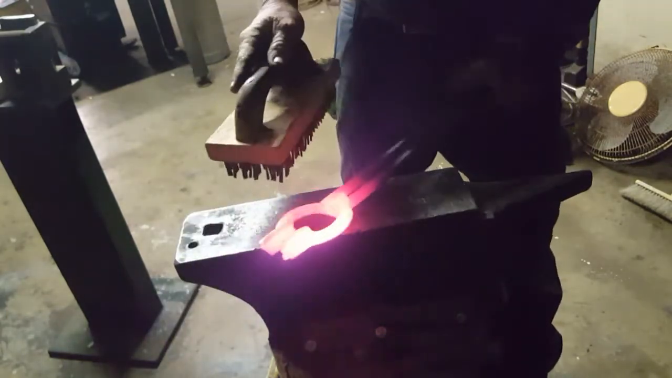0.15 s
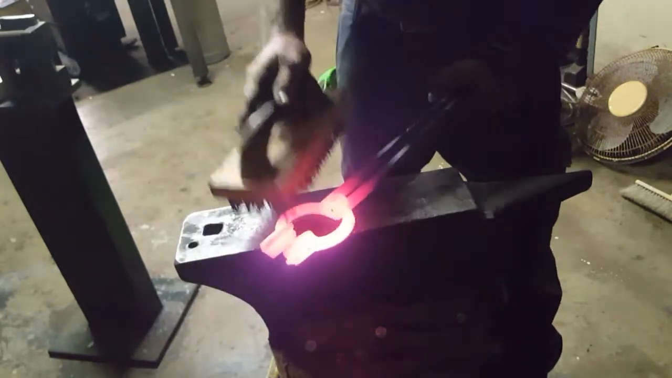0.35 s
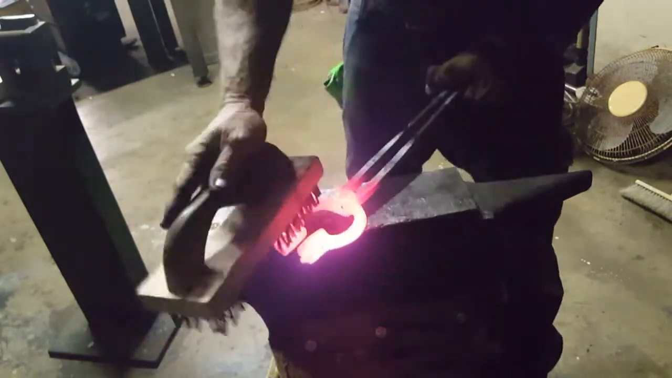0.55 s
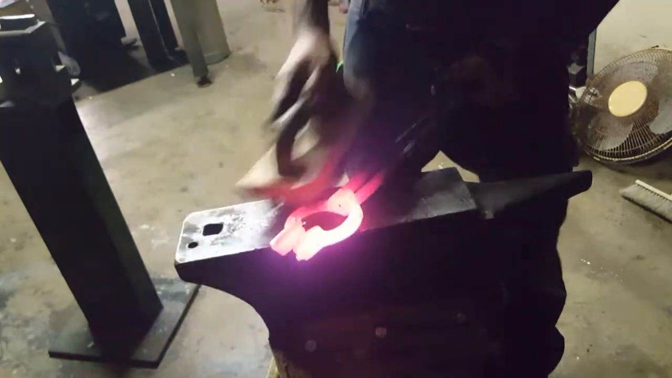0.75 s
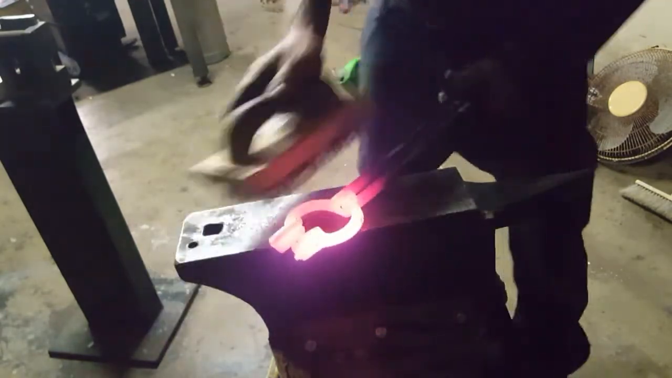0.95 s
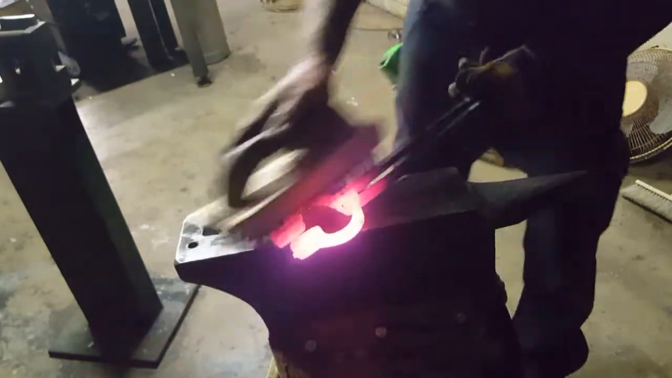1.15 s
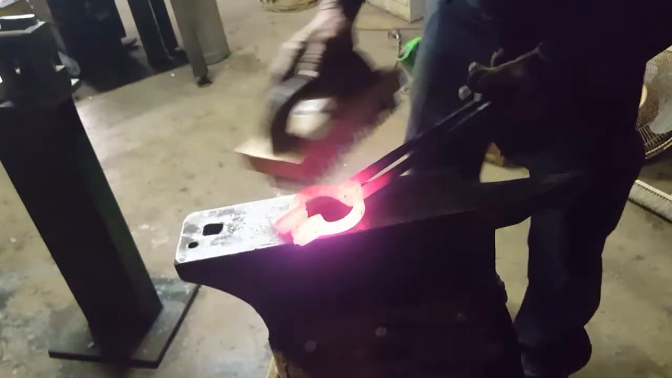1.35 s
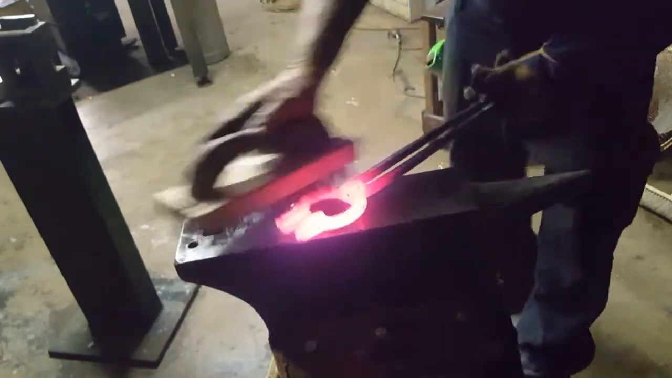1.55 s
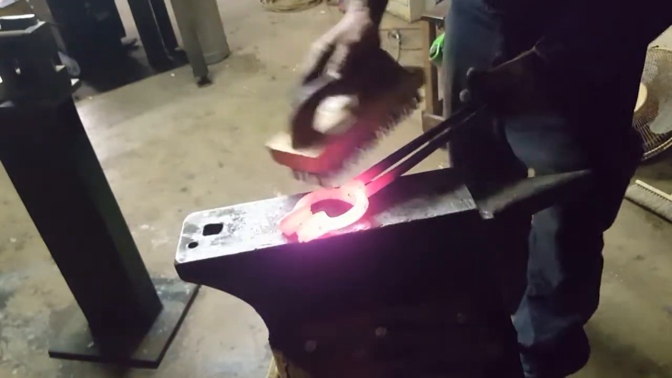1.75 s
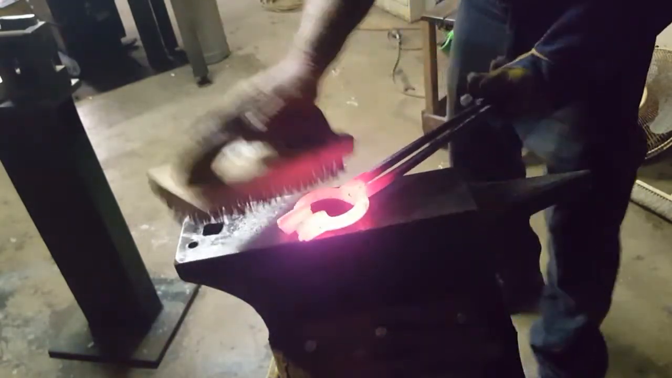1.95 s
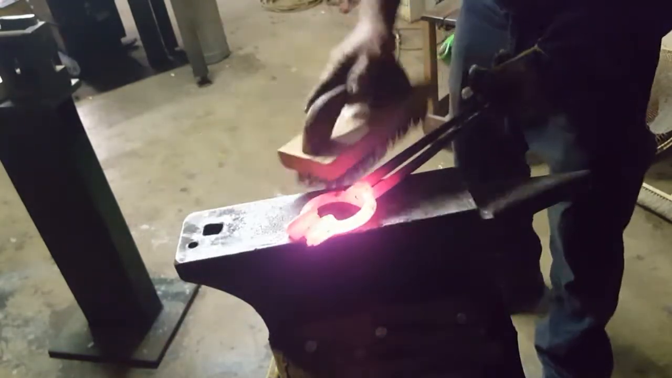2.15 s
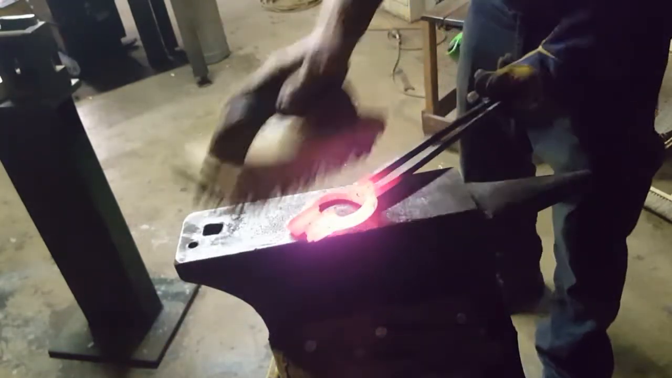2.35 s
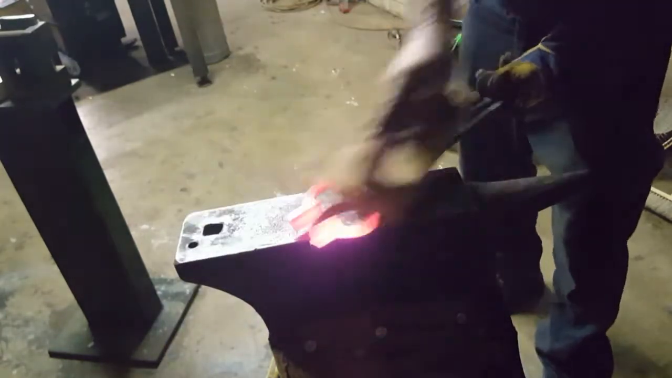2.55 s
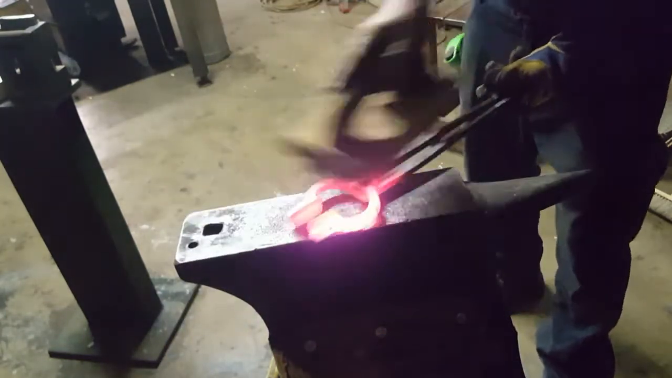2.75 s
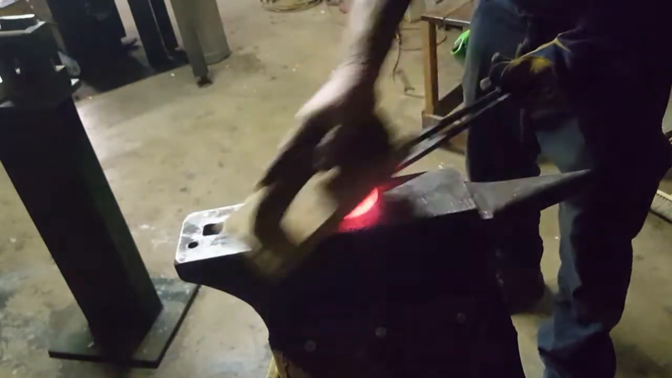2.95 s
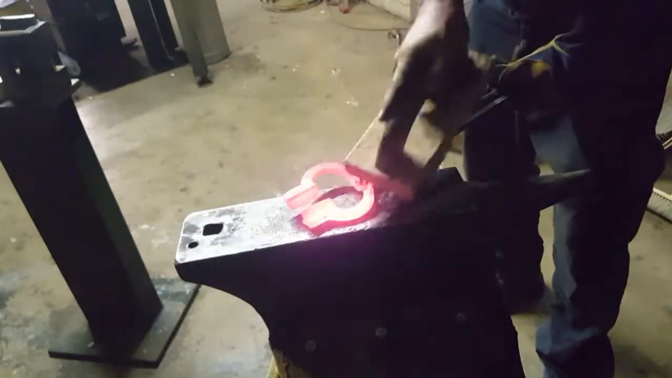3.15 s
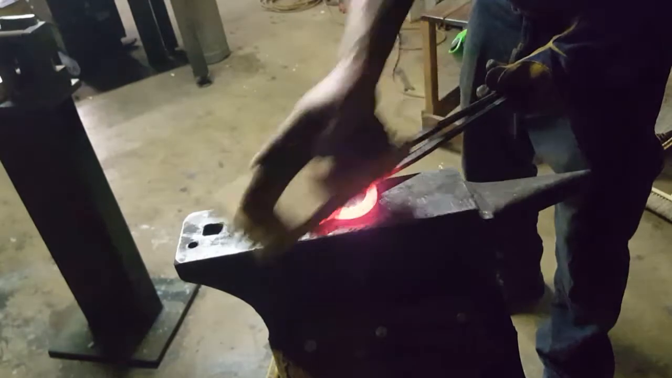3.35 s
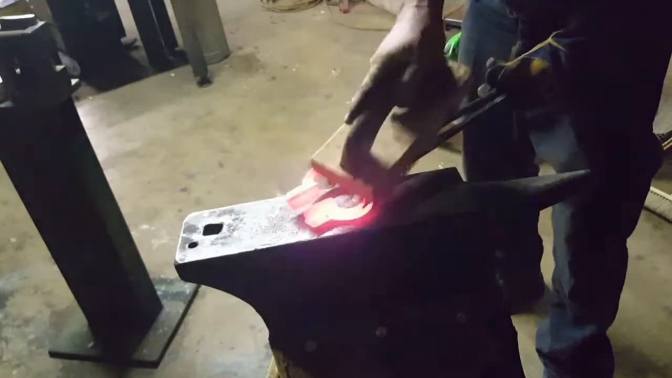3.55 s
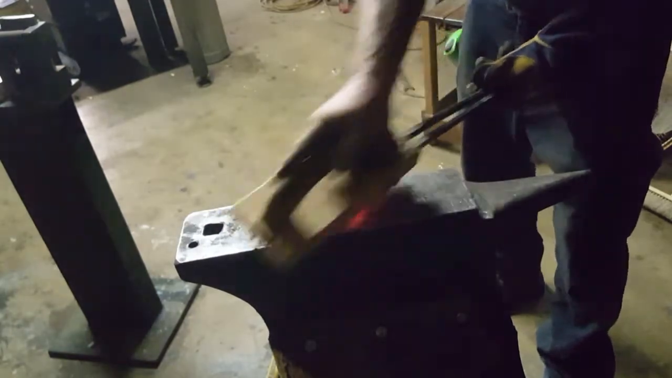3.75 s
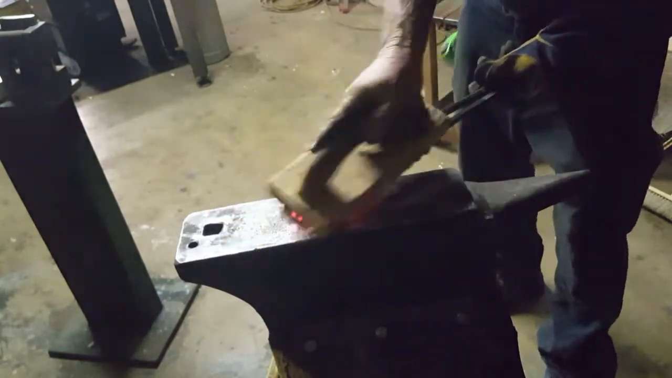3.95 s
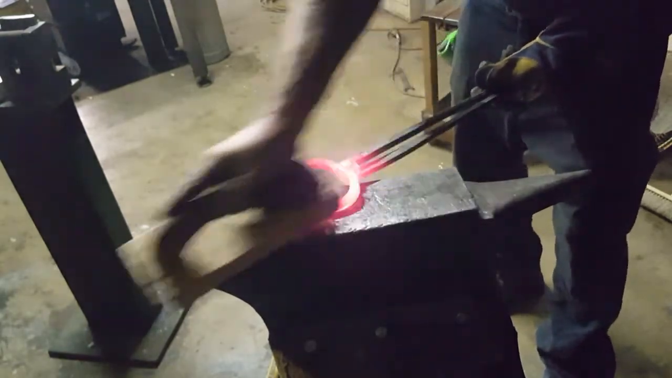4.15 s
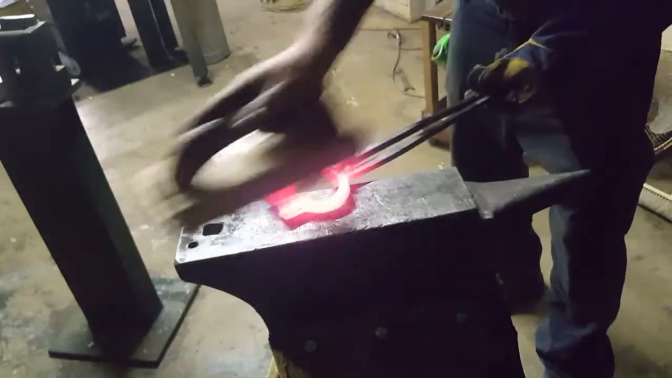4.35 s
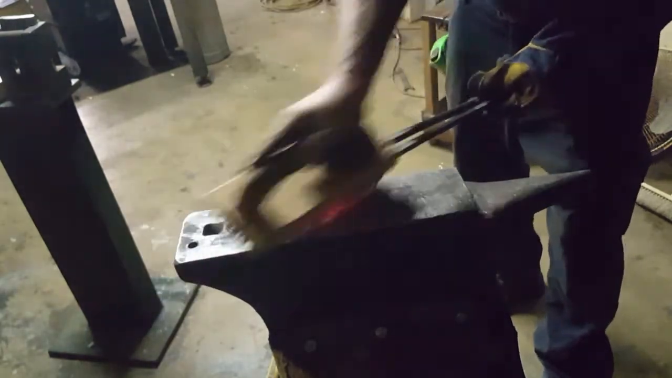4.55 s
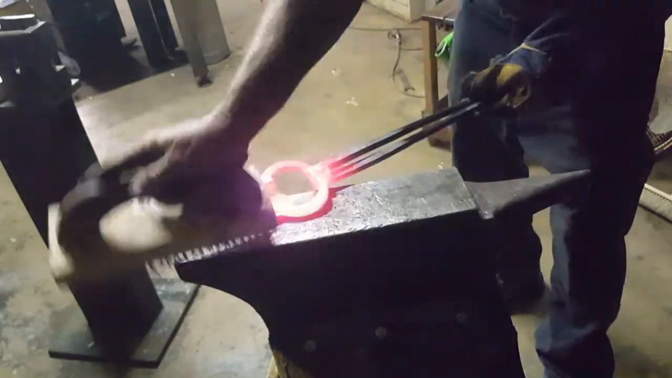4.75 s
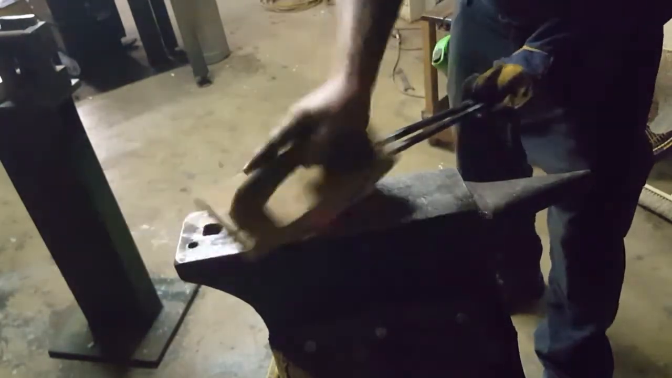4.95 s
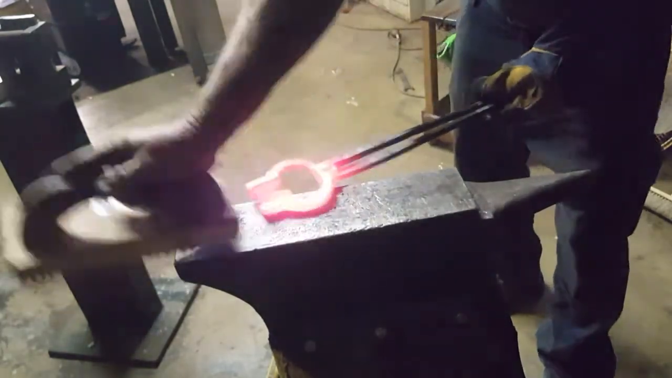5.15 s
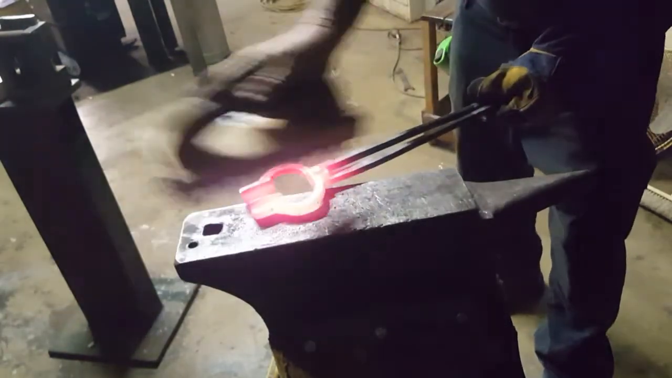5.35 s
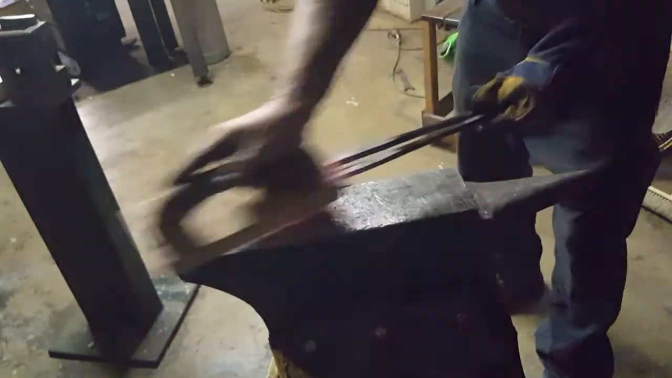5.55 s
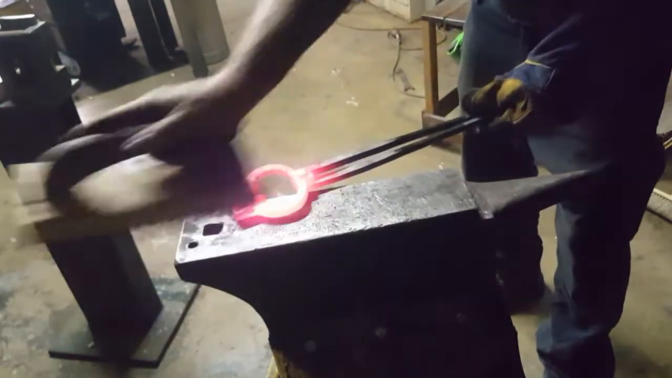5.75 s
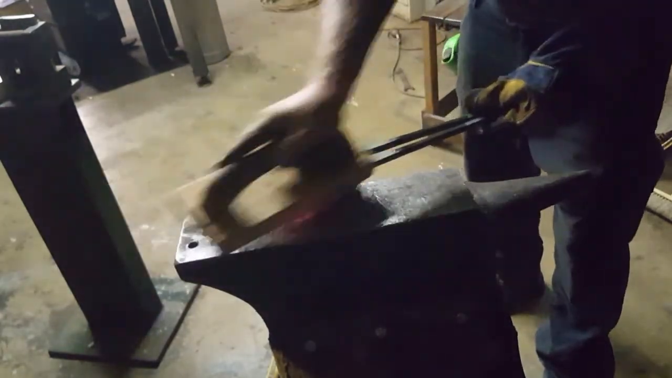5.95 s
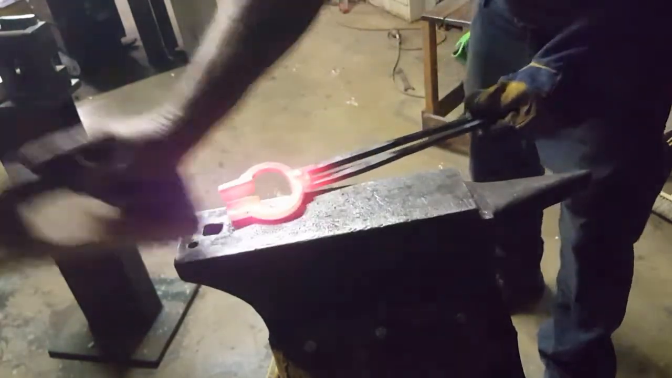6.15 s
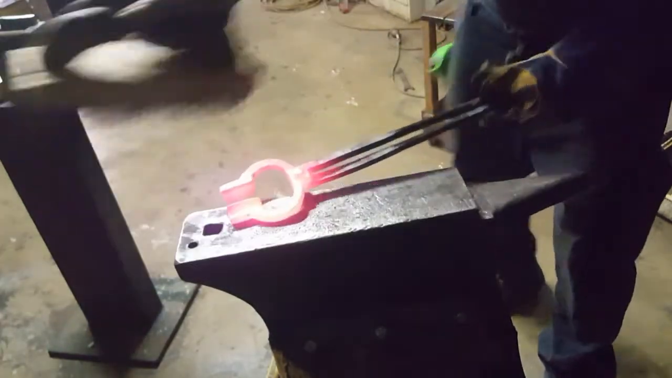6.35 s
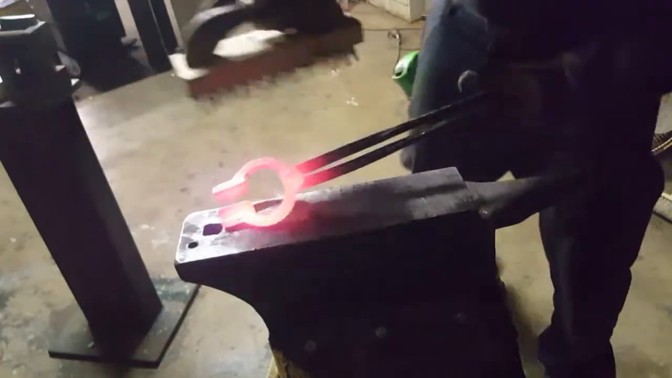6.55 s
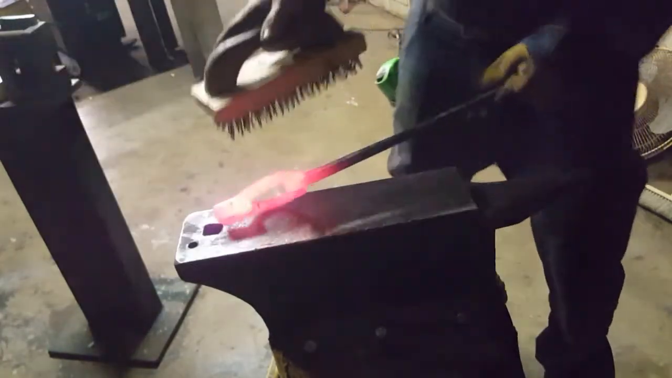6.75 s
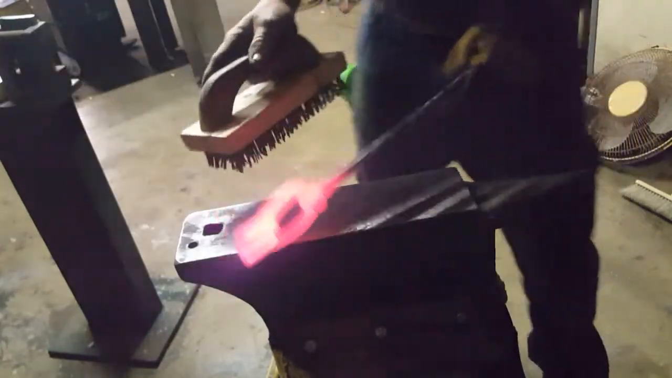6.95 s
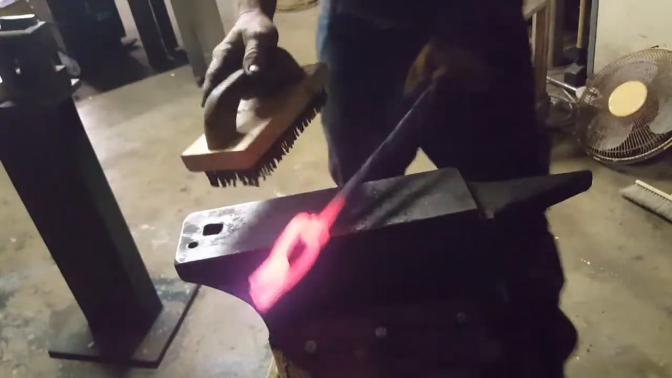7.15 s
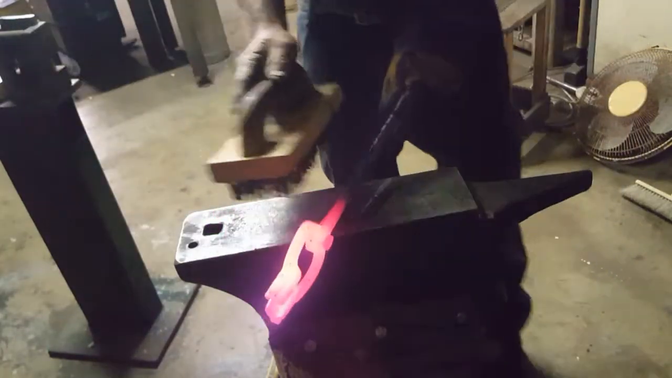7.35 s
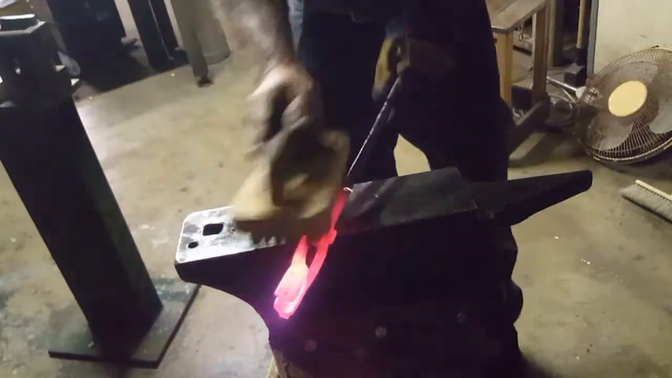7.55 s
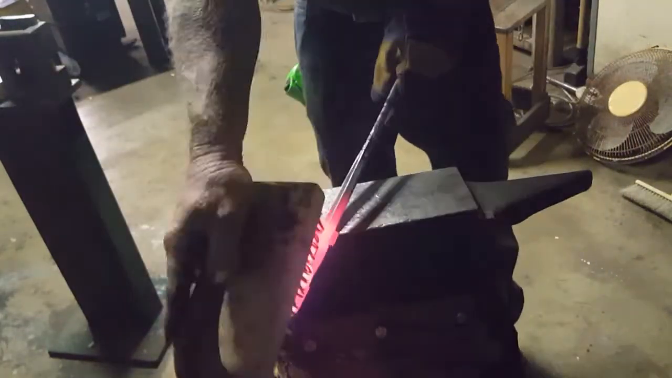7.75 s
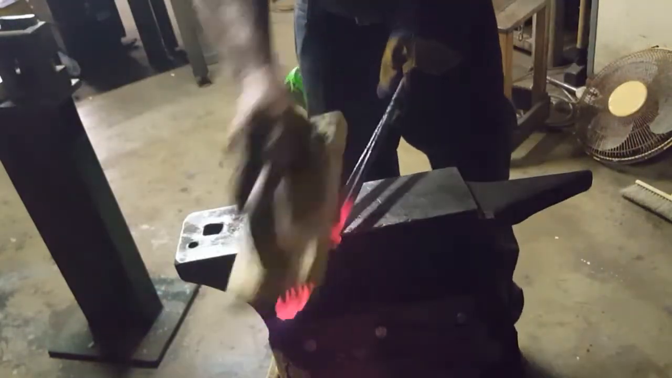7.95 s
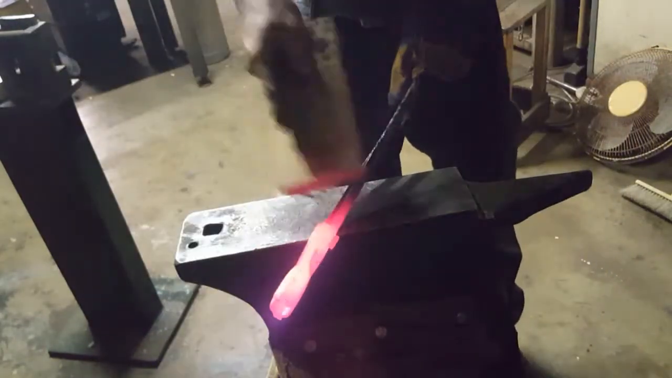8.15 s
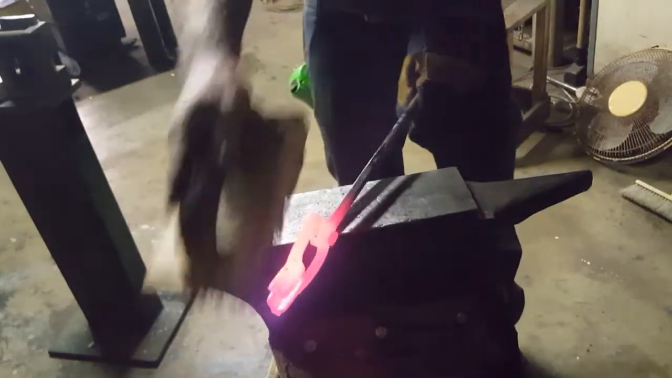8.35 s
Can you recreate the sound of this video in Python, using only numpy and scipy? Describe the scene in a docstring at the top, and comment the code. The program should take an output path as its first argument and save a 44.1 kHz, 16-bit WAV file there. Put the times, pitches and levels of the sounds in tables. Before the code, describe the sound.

A faint gas-forge roar with thin high hiss runs throughout a bare, briefly echoing workshop, heard close through a small microphone. At 0.06 s a wire brush lands and scrapes hot forging; near 0.65 s the piece cracks and clanks on the anvil. Scrubs follow at about 0.9, 1.15, 1.6, 2.0, 2.5, 3.0 and 3.45 s: gritty, snagging, metallic ringing around 1.3 to 4 kHz under bristle hiss, with low stand thumps and dull block knocks. A small tong ting sounds near 3.7 s. From 3.9 to 4.7 s strokes crowd together, then longer, brighter ones come at 5.0, 5.5, 6.0 and 6.47 s, with soft dull knocks between. Brushing stops around 6.7 s. Turning the piece brings light clanks and a short ting at 7.2 s, a sharp clank at 7.5 and a fuller one at 7.7 s. A weaker scrape comes at 8.07 s, then a brief touch at 8.25 and a final clank at 8.38 s.

```python
"""A block brush of stiff steel wires lands on a hot forging held on an anvil and scrubs across it in quick strokes.
Snagging and freed wires are random impulses that excite resonances of forging and tongs; their treble is a hiss,
and the push shakes the modes of the anvil stand. The forging clanks as struck modes when it is turned, the block
sounds dully and tongs ting. A bare workshop answers with decaying noise, over a gas forge of filtered noise."""
import sys
import numpy as np
from scipy import signal
from scipy.fft import rfft, irfft, next_fast_len
from scipy.io import wavfile
from scipy.ndimage import uniform_filter1d

SR = 44100
rng = np.random.default_rng(int(sys.argv[2]) if len(sys.argv) > 2 else 0)


def generate_wav(signal):
    """Clip the signal to [-1, 1] and save it as 16-bit WAV at the path in sys.argv[1]."""
    frames = np.transpose(np.atleast_2d(signal))
    scaled = np.clip(frames, -1, 1) * 32767
    pcm = np.round(scaled).astype(np.int16)
    wavfile.write(sys.argv[1], SR, pcm)


N = 370219

# Brush strokes, levels before the weights of each layer. Each row: landing in seconds; full pressure, top speed and
# lift-off in seconds after landing; fade after lift-off in dB per second; then levels in dB of low, middle and high
# ring, wire hiss, block rumble, stand shake, landing thud and landing knock.
STROKES = [(0.0608, 0.003, 0.083, 0.12, -220, -28, -21, -28.5, -28.5, -45, -26, -49, -46),
           (0.9017, 0.056, 0.12, .12, -260, -27, -23, -30.5, -25, -53, -33, -53, -58),
           (1.1167, 0.0027, 0.0093, 0.021, -300, -36, -47, -33, -35, -57, -50, -39, -50),
           (1.1463, 0.032, 0.032, 0.17, -230, -26.5, -20.5, -26, -24.5, -45, -30, -30.5, -50),
           (1.584, 0.0023, 0.0066, 0.049, -300, -36, -30.5, -38, -35.5, -54, -37, -35, -43),
           (1.638, 0.0062, 0.054, .14, -230, -23, -22.5, -26, -21.5, -38, -34, -42, -42),
           (2.0281, 0.052, 0.11, 0.18, -230, -23.5, -21.5, -23, -21.5, -40, -27.5, -41, -50),
           (2.4986, 0.004, 0.044, .15, -230, -25, -23, -26.5, -20.5, -37.5, -31.5, -24.5, -27.5),
           (2.9574, 0.011, 0.045, 0.14, -200, -22.5, -20.5, -22, -24, -47, -29, -50, -36),
           (3.4549, 0.0034, 0.03, .17, -230, -26.5, -21.5, -24, -26.5, -44, -30.5, -33.5, -26),
           (3.9046, 0.047, 0.078, .15, -200, -24.5, -20.5, -19.5, -24.5, -42, -29.5, -30, -18.5),
           (4.141, 0.018, 0.033, 0.043, -300, -23, -19.5, -28, -25.5, -48, -33, -36, -53),
           (4.21, 0.022, 0.037, 0.068, -330, -27, -24, -24, -24.5, -40, -30, -37, -41),
           (4.373, 0.024, 0.084, 0.095, -350, -25.5, -19.5, -24, -28, -62, -41, -50, -43),
           (4.527, 0.045, 0.093, 0.18, -240, -21.5, -21.5, -20.5, -21, -40, -29.5, -57, -50),
           (4.9866, 0.041, .16, 0.23, -200, -21.5, -21.5, -20, -21, -38.5, -32.5, -25, -48),
           (5.4877, 0.017, 0.1, 0.19, -250, -24.5, -17, -18, -21.5, -49, -30, -29, -40),
           (5.9849, 0.0044, 0.18, 0.2, -200, -23.5, -22, -22, -21, -40.5, -28.5, -24.5, -24),
           (6.29, .04, .05, 0.091, -200, -72, -60, -45, -82, -57, -62, -70, -70),
           (6.4691, 0.0042, 0.14, 0.19, -250, -23, -22.5, -21.5, -21.5, -37, -33.5, -24, -35.5),
           (8.067, 0.03, 0.049, 0.11, -150, -31, -27, -30, -27.5, -44.5, -39.5, -38, -41),
           (8.2553, .005, 0.013, 0.013, -250, -35, -42, -40, -33, -67, -68, -58, -59)]
# A tuft lands or catches hard. Each row: time in seconds, relative peak in dB, pitch that rings most in Hz.
CATCHES = [(0.062, -6, 3160), (0.0732, -4.5, 1380), (0.0915, -6, 3220), (0.143, -18, 3300),
           (0.1744, -22, 1730), (0.8996, -20, 2430), (0.9216, -10, 3280), (0.9714, -20, 3450),
           (1.0094, -6.5, 2370), (1.145, -9.5, 2300), (1.1734, -5, 1360), (1.2088, -6.5, 3310),
           (1.2741, -2.5, 3320), (1.343, -23, 3800), (1.583, -20, 4540), (1.638, -6.5, 1300),
           (1.708, -0.5, 3200), (2.0272, -27, 3100), (2.04, -19, 2400), (2.0591, -10, 1750),
           (2.139, -5, 3260), (2.4973, -3, 2350), (2.5485, -9, 3310), (2.578, -7, 3310), (2.9564, -8, 2900),
           (2.9678, -2.5, 2180), (3.068, -12, 3300), (3.1566, -12, 3140), (3.4558, -6, 1990),
           (3.462, -8, 1540), (3.486, -4.5, 3960), (3.5168, -4.5, 1680), (3.5334, -4, 1330),
           (3.548, -0.5, 3240), (3.578, -6, 3300), (3.596, -17, 3280), (3.67, -15, 2400),
           (3.9029, -2.5, 2450), (3.9084, -4, 2470), (3.9574, -4, 1400), (4.14, -8, 3220), (4.17, -8, 3300),
           (4.212, -14, 3970), (4.2326, -5, 3340), (4.2541, -4.5, 3400), (4.3733, -21, 3310),
           (4.398, -3, 1300), (4.439, -6, 3370), (4.4715, -5, 1330), (4.5285, -6.5, 3900),
           (4.546, -8.5, 3880), (4.61, -7, 3880), (4.719, -9.5, 4000), (4.767, -22, 1620),
           (4.9868, -9.5, 2610), (5.0198, -7.5, 1610), (5.031, -6, 3850), (5.127, -7, 1620),
           (5.099, -10, 3300), (5.2805, -16, 3800), (5.4872, -3.5, 3650), (5.527, -9, 3910),
           (5.9843, -7, 3200), (6.091, -10, 1400), (6.4687, 0, 3080), (6.503, -10, 3820), (6.535, -5, 3230),
           (6.62, -4, 2090), (8.0504, -23, 1330), (8.0662, -16.5, 1360), (8.137, -11, 3240),
           (8.257, -9, 3880), (8.2972, -17, 3990)]
BLOCK_HZ, BLOCK_T60_S = 280, 0.25  # the block's own note


def undb(db):
    """Decibels become gain by the amplitude law of 20 dB per factor of ten."""
    return 10 ** (np.asarray(db) / 20)


def unit(x):
    """Dividing by the root mean square brings a signal to rms 1."""
    return x / np.sqrt(np.mean(x ** 2))


def decay_per_sample(t60):
    """Exponential decay: the factor per sample that loses 60 dB in t60 seconds."""
    return np.exp(-np.log(1000) / (t60 * SR))


def mode(x, hz, t60):
    """A damped oscillator is a pole pair; it answers a unit click with a decaying sine that starts near 1."""
    r, w = decay_per_sample(t60), 2 * np.pi * hz / SR
    return signal.lfilter([0, np.sin(w)], [1, -2 * r * np.cos(w), r * r], x)


def colour(x, points):
    """A linear filter multiplies the spectrum: gain is interpolated in (Hz, dB) points on a log axis."""
    hz, db = np.transpose(points)
    size = next_fast_len(N)
    f = np.maximum(np.arange(size // 2 + 1) * SR / size, 1)
    gain = undb(np.interp(np.log(f), np.log(hz), db))
    return irfft(rfft(x, size) * gain, size)[:N]


def colour_pair(x, points):
    """Identical linear filters on both channels."""
    return np.array([colour(channel, points) for channel in x])


def band(x, lo_hz, hi_hz):
    """A broad Butterworth band-pass keeps one region of the spectrum."""
    return signal.sosfilt(signal.butter(2, [lo_hz, hi_hz], "band", fs=SR, output="sos"), x)


def walk(rate):
    """Slow random modulation: normal levels held 1 / rate s, smoothed into ramps."""
    hold = int(SR / rate)
    steps = np.repeat(rng.standard_normal(N // hold + 1), hold)
    return uniform_filter1d(steps, hold)[:N]


def flicks(rate, scatter_db):
    """Shot noise: wire tips flick free at random moments, a few much stronger than the rest; rms 1."""
    count, out = int(rate * N / SR), np.zeros(N)
    strength = undb(scatter_db * rng.exponential(size=count))
    out[rng.integers(0, N, count)] = rng.standard_normal(count) * strength
    return unit(out)


def jerks(rate, t60, steady):
    """Stick-slip friction: tufts stick, let go at once and settle, a jagged drag force of rms 1."""
    slips = signal.lfilter([1], [1, -decay_per_sample(t60)], np.abs(flicks(rate, 0.52)))
    return unit(unit(slips) + steady)


def pair(make):
    """Spatial coherence: two ports hear one source partly alike, the bass more than most of the treble."""
    # Left-right likeness. Each row: frequency in Hz, correlation from 0 to 1.
    likeness = [(60, 0.78), (300, 0.9), (700, 0.42), (1500, 0), (4000, 0), (14000, 0.11)]
    hz, like = np.transpose(likeness)
    like = np.clip(like, 0, .99)  # keeps the side level finite in dB
    mid = colour(make(), list(zip(hz, 10 * np.log10((1 + like) / 2))))
    side = colour(make(), list(zip(hz, 10 * np.log10((1 - like) / 2))))
    return np.array([mid + side, mid - side])


def clicks(s, db):
    """Impulsive excitation: each blow is a single sample."""
    out = np.zeros(N)
    out[(s * SR).astype(int)] = undb(db)
    return out


def burst(train, t60):
    """Repeated contact: a sharp first blow, then a short decaying noise of others, unlike at the two ports."""
    fade = signal.lfilter([1], [1, -decay_per_sample(t60)], train)
    rattle = rng.standard_normal(N) + 0.46 * rng.standard_normal((2, N))
    return 1.44 * train + fade * rattle


def favour_db(hz, best_hz, db_per_octave):
    """Modal participation: where a blow falls decides which resonance it wakes most."""
    return -db_per_octave * np.abs(np.log2(hz / best_hz))


def room(x):
    """Diffuse reverberation: convolution with decaying noise, duller than the direct sound."""
    t60_s, level_db, cutoff_hz = 0.31, -8, 6550
    t = np.arange(int(t60_s * SR)) / SR
    noise = pair(lambda: rng.standard_normal(N))[:, :len(t)]
    tail = noise * undb(-60 * t / t60_s) * np.clip(t / 0.0037, 0, 1)
    tail = signal.lfilter(*signal.butter(1, cutoff_hz, fs=SR), tail)
    tail = tail / np.sqrt(np.sum(tail ** 2, axis=1, keepdims=True))
    return undb(level_db) * signal.fftconvolve(x.mean(axis=0, keepdims=True), tail, axes=1)[:, :N]


def forge():
    """Turbulence as filtered noise: burner roar, roar of changing level, gas hiss, rough whine, wandering rumble."""
    # Spectra of roar and gas hiss. Each row: frequency in Hz, relative density in dB per Hz.
    roar_points = [(15, -55), (25, -12), (348, -13.5), (384, -31), (444, -7), (514, -11), (798, -11),
                   (1240, -12.5), (1330, -17), (1470, -8.5), (1620, -15), (3280, -25.5), (8500, -46),
                   (11000, -98), (18700, -120)]
    gas_points = [(8300, -51), (9300, -2), (10300, 2), (12500, -4), (13500, -8.5), (14200, -32)]
    # Levels of the 700-1000 Hz roar and of the low rumble. Each row: time in seconds, level in dB.
    low_roar_levels = [(0.0, -45.5), (1.0, -56.5), (1.5, -66), (2.5, -64), (2.94, -47.5), (3.53, -44.5),
                       (4.09, -55), (5.63, -38.5), (5.82, -45), (6.73, -51.5), (7.6, -46.5), (8.39, -53)]
    rumble_levels = [(0.0, -37), (0.6, -48), (1.7, -47), (2.6, -50), (3.4, -51), (4.7, -59), (5.9, -49),
                     (6.63, -47.5), (6.82, -58), (7.6, -62), (7.95, -46), (8.39, -63)]
    roar_db, gas_db, whine_db = -47, -54, -60.5
    t = np.arange(N) / SR

    roar = unit(pair(lambda: colour(rng.standard_normal(N) * undb(1.2 * walk(6)), roar_points)))
    gas = unit(pair(lambda: colour(rng.standard_normal(N), gas_points)))
    whine = unit(mode(rng.standard_normal((2, N)), 3293, t60=0.054))
    whine = whine * undb(whine_db + 1.0 * walk(18))
    low_roar = unit(band(pair(lambda: rng.standard_normal(N)), 670, 1080))
    low_roar = low_roar * undb(np.interp(t, *np.transpose(low_roar_levels)))
    rumble = unit(band(rng.standard_normal(N) + 0.22 * rng.standard_normal((2, N)), 34, 150))
    rumble = rumble * undb(np.interp(t, *np.transpose(rumble_levels)))
    return roar * undb(roar_db) + gas * undb(gas_db) + whine + low_roar + rumble


def stand(push):
    """Modal superposition: the anvil stand booms under every push, a little louder on the right."""
    # Stand modes. Each row: frequency in Hz, level in dB, decay time t60 in seconds.
    stand_modes = [(115, -4, 0.11), (143.3, 1, 0.19), (183, 0.1, 0.084), (281.4, -1, 0.22),
                   (430, -14, 0.23), (546, -12.5, 0.074), (733, -16, 0.061), (850, -17, 0.042)]
    boom = sum((-1) ** k * undb(db) * mode(push, hz, t60) for k, (hz, db, t60) in enumerate(stand_modes))
    return boom * undb([[-.7], [.7]])


def tings():
    """Damped free vibration: a tong note swells in, fades slowly with a wavering level, then the grip stops it."""
    # Tong notes. Each row: start in seconds, level in dB, pitch in Hz, length before the final damping in seconds.
    tong_notes = [(.75, -56, 1760, .1), (3.69, -41, 1660, .13), (7.184, -41, 2008, .05),
                  (7.2, -54, 1760, .2)]
    out, t = 0, np.arange(N) / SR
    for s, db, hz, length in tong_notes:
        swell = np.clip((t - s) / .008, 0, 1)
        grip = np.clip(1 - (t - s - length) / .03, 0, 1)
        level = undb(db - 60 * np.clip(t - s, 0, 1) / .6)
        out = out + level * swell * grip * undb(2 * walk(60)) * np.sin(2 * np.pi * hz * t)
    return out


def knocks():
    """Modal excitation: a short dull rattle, a boom of the stand and the block's note, woken by knocks or rubbing."""
    # Knocks of the block, and its 280 Hz note woken by knocks or rubbing. Each row: time in seconds, relative peak
    # in dB, then boom and block note in dB re peak.
    block_sounds = [(0.176, -25, -4, -7), (0.719, -32, -1, -8), (1.03, -29, -5, -14), (2.094, -27, -6, -19),
                    (2.67, -36, -20, 0.5), (3.03, -24.5, -7, 0.5), (3.07, -32, -16, 1.5),
                    (3.93, -33, -24, 8), (4.259, -26, -14, -3), (5.312, -19, -17, -23),
                    (5.745, -17, -14.5, -21.5), (6.119, -19, -15.5, -17), (6.261, -24.5, -16.5, -21),
                    (6.569, -18.5, -13, -17), (6.63, -27, 1, -3), (6.7, -21, -16, -20.5),
                    (7.85, -43, 7.5, -16), (7.998, -40, 5, -8), (8.02, -44, 3.5, -10),
                    (8.109, -38, 4.5, -6)]
    s, peak_db, boom_db, note_db = np.transpose(block_sounds)
    rap = undb(9.5) * band(burst(clicks(s, peak_db), 0.044), 380, 870)
    note = mode(clicks(s, peak_db + note_db), BLOCK_HZ, BLOCK_T60_S)
    return rap + stand(clicks(s, peak_db + boom_db)) + note


def clanks():
    """Struck modes: a crack, the short free ring of the forging, a full noisy body and a rattle as it settles."""
    # The forging knocks the anvil. Each row: time in seconds, relative peak in dB, then body, boom, free ring and
    # rattle in dB re peak, and the pitch that rings most in Hz.
    anvil_blows = [(0.637, -40, 0, -1, -7, -30, 1400), (0.652, -14.5, -33, -24, -30, -31, 3260),
                   (0.6996, -20, -17, -19, -23, -50, 3310), (7.1808, -28.5, -9, -18.5, -4, -23.5, 2010),
                   (7.2403, -31, -3, -17, -10, -24, 2030), (7.5156, -11.5, -14, -17.5, -9, -27, 2860),
                   (7.7303, -17, -3, -3.5, -6, -15, 2900), (8.3822, -22.5, -35, -31, -10, -30, 2970)]
    # Modes of the free forging. Each row: frequency in Hz, level in dB, decay time t60 in seconds.
    forging_modes = [(1540, -8, 0.035), (1755, -10.5, 0.18), (2035, -4, 0.07), (2260, -4.5, 0.028),
                     (2890, -2.5, 0.064), (3000, -3.5, 0.065), (3310, -11, 0.085), (3900, -21, 0.035),
                     (3460, -10, .05), (4540, -19, .04)]
    s, peak_db, body_db, boom_db, free_db, rattle_db, best_hz = np.transpose(anvil_blows)
    ring = 0
    for k, (hz, db, t60) in enumerate(forging_modes):
        blow = clicks(s, peak_db + free_db + favour_db(hz, best_hz, 1.9))
        ring = ring + (-1) ** k * undb(db) * mode(blow, hz, t60)
    crack = undb(-7.5) * band(burst(clicks(s, peak_db), 0.045), 1100, 5400)
    tick = undb(-16.5) * band(burst(clicks(s, peak_db), 0.095), 5500, 14400)
    rattle = band(burst(clicks(s, peak_db + rattle_db), 0.91), 850, 4800)
    body = undb(14.0) * band(burst(clicks(s, peak_db + body_db), 0.17), 370, 940)
    return ring + crack + tick + rattle + stand(clicks(s, peak_db + boom_db)) + body


def controls():
    """Friction excitation: pressure drives ring, rumble and shake, speed drives hiss; silent before the landing."""
    # Change of the low, middle and high ring along a stroke, in dB per second: the ring brightens.
    ring_drifts = [-3, -4, 3]
    touch_db, sag_db_per_s = -12.5, -23  # pressure at first touch, and while held
    bounce_s, bounce_width_s, bounce_db, hard_s = 0.036, 0.0061, -5.5, 0.026  # a quick landing rebounds once
    slow_db, slowing_db = -12, -1.5  # hiss at landing and at lift-off re top speed
    hiss_touch = 0.46  # share of the light first touch that the hiss follows
    hiss_fade, low_fade = 0.82, 0.5  # shares of the fade; block and stand settle more slowly

    out, t = np.zeros((6, N)), np.arange(N) / SR
    for s, press, fast, lift, fade, *rings_db, hiss_db, rumble_db, shake_db, _, _ in STROKES:
        on = slice(int(s * SR), int((s + 1) * SR))
        u = t[on] - s
        off = fade * np.maximum(u - lift, 0)
        touch = touch_db * np.maximum(1 - u / max(press, .001), 0)
        bounce = bounce_db * np.exp(-press / hard_s - ((u - bounce_s) / bounce_width_s) ** 2)
        held = touch + sag_db_per_s * np.clip(u, 0, lift) + bounce
        early = np.clip(1 - u / fast, 0, 1)
        late = np.clip((u - fast) / max(lift - fast, .01), 0, 1)
        speed = hiss_touch * touch + slow_db * early ** 2 + slowing_db * late ** 2 + hiss_fade * off
        low = held + low_fade * off
        rings = [db + drift * u + held + off for db, drift in zip(rings_db, ring_drifts)]
        out[:, on] += undb([hiss_db + speed, rumble_db + low, shake_db + low] + rings)
    return out


def scrubbed_ring(drag, groups):
    """Forced resonance: each mode is fed by its own tufts, so the colour keeps shifting."""
    # Forging, tongs and wires under the brush. Each row: frequency in Hz, bandwidth in Hz, level in dB.
    brushed_modes = [(1248, 9.5, -17), (1341, 55, -7.5), (1462, 54, -11), (1629, 75, -8), (1837, 150, -8),
                     (2084, 160, -10), (2377, 93, -7), (3140, 480, -10.5), (3304, 79, -5.5),
                     (3960, 190, -12), (3902, 153, -7), (4236, 160, -15.5), (4830, 1300, -12.5),
                     (6650, 140, -17)]
    # Upper limits in Hz of the low and middle ring groups.
    group_tops = [2700, 3500]
    s, peak_db, best_hz = np.transpose(CATCHES)
    out = 0
    for hz, width, db in brushed_modes:
        t60 = np.log(1000) / (np.pi * width)
        tufts = np.array([flicks(2500, 3.6) for _ in range(3)])
        rub = tufts[0] + 0.71 * tufts[1:]  # one shared part, one for each port
        rub = rub * drag * undb(2.3 * walk(14)) * jerks(50, 0.12, 0.81)
        rub = rub * groups[np.searchsorted(group_tops, hz)]
        catch = burst(clicks(s, peak_db + favour_db(hz, best_hz, 24.0)), 0.041)
        push = undb(7.5) * rub + undb(3.0) * catch
        out = out + undb(db) * np.sqrt(width / SR) * mode(push, hz, t60)
    return out


def wire_hiss(drag, level):
    """Dense shot noise: countless small flicks of the wires blend into hiss, with a burst at every catch."""
    # Spectrum of the wires. Each row: frequency in Hz, relative density in dB per Hz.
    wire_points = [(1470, -23), (2500, -6.5), (3210, -4.5), (3580, -3.5), (3970, -4), (4730, -6),
                   (10500, -8.5), (14400, -9.5)]
    s, peak_db, _ = np.transpose(CATCHES)
    wires = unit(colour_pair(pair(lambda: flicks(7000, 0.21) * drag ** 0.25), wire_points))
    return wires * level + undb(-23.5) * band(burst(clicks(s, peak_db), 0.087), 2900, 8600)


def block(level, knock):
    """Structure-borne sound: the rubbing rumbles in the block; landings and catches wake a rattle and its own mode."""
    rumble = unit(band(pair(lambda: flicks(900, 2.2)), 380, 1200)) * level
    rattle = undb(10.0) * band(burst(knock, 0.13), 216, 547)
    return rumble + rattle + undb(-3.5) * mode(knock, BLOCK_HZ, BLOCK_T60_S)


def brush():
    """Friction and impact ring the forging, hiss in the wires, sound the block and shake the stand."""
    pan_db = -1.5  # left minus right, without the stand
    catch_thud_db, catch_knock_db = -36, -35.5  # re peak of the catch
    hiss, rumble, shake, *groups = controls()
    drag = jerks(250, .03, 1.2)
    s, peak_db, _ = np.transpose(CATCHES)
    lands, *_, thud_db, knock_db = np.transpose(STROKES)
    knock = clicks(lands, knock_db) + clicks(s, peak_db + catch_knock_db)
    thud = clicks(lands, thud_db) + clicks(s, peak_db + catch_thud_db)
    out = scrubbed_ring(drag, groups) + wire_hiss(drag, hiss) + block(rumble, knock)
    push = undb(-37) * flicks(900, 2.0) * shake + undb(-2.5) * thud
    return out * undb([[pan_db / 2], [-pan_db / 2]]) + stand(push)


def scene():
    """Superposition: brush, clanks, block and tings near the microphone, in the room, over the forge."""
    near = brush() + clanks() + knocks() + tings()
    return near + room(near) + forge()


def record(dry):
    """Band limits and saturation: a small microphone loses deep bass and rounds peaks; the recorder cuts the top."""
    bass_cut_hz, top_hz = 64, 14450
    thin = signal.sosfilt(signal.butter(2, bass_cut_hz, "high", fs=SR, output="sos"), dry)
    rounded = np.tanh(1.146 * thin) / 1.075
    return signal.sosfilt(signal.ellip(10, .2, 90, top_hz, fs=SR, output="sos"), rounded)


dry = scene()
out = record(dry)
generate_wav(out)
```